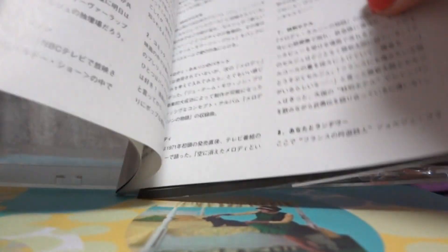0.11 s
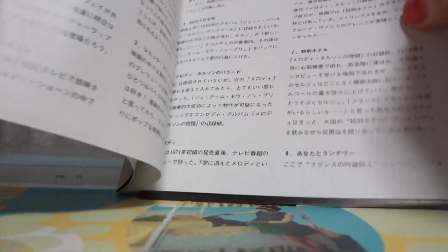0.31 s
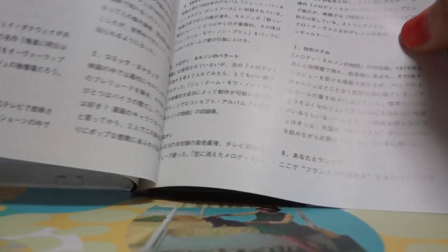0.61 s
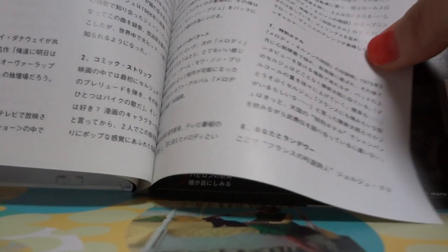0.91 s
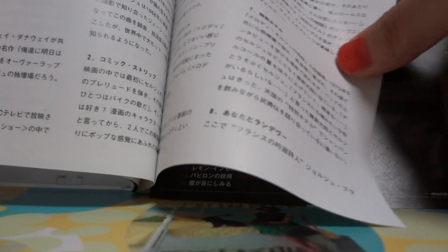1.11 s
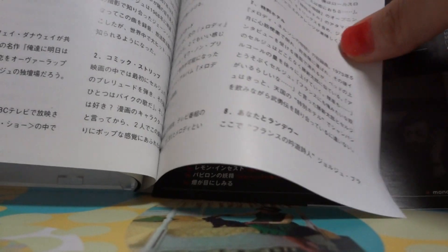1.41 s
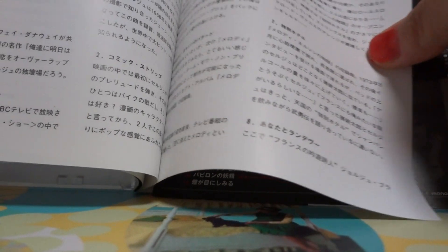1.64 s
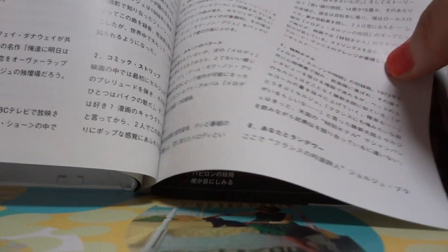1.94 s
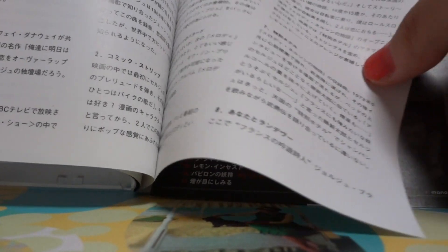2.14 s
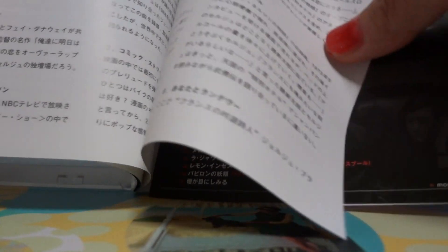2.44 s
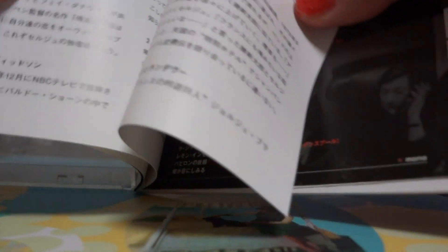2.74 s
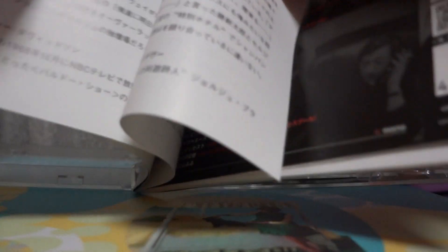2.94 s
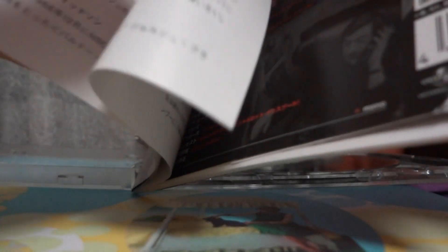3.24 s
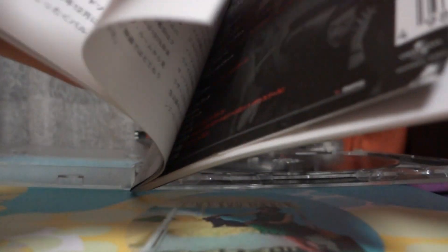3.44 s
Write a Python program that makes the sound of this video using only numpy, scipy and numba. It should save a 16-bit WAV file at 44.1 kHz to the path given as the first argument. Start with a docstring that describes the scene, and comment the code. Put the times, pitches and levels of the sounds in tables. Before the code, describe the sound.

Close up in a quiet room, stiff paper rustles lightly, scrapes in uneven strokes over the sheet below, nearly pauses, then flips with fast airy swishes and tiny snaps, leaving faint room noise.

```python
"""At a table in a quiet room, a thumb drags a thick booklet page across the one below, then lifts and turns it.
The rub is many tiny noise grains: resonances of the air pocket under the arched page colour the drag,
and brighter ones colour the swishes of the free pages. Short noise bursts make the ticks of buckling paper,
soft low swells make the bumps in the table. Short echoes, room noise and one faint steady tone lie around it."""
import sys
import numpy as np
from scipy import signal
from scipy.io import wavfile
from numba import njit

SR = 44100
rng = np.random.default_rng(int(sys.argv[2]) if len(sys.argv) > 2 else 0)


def voltage_ratio(decibels):
    """Convert decibels (scalar or array-like) to amplitude ratios, 20 dB per decade."""
    exponent = np.asarray(decibels, float) / 20
    return 10 ** exponent


def to_wav(sig):
    """Store sig (one row per channel, or 1-D mono) as 16-bit WAV at the path in sys.argv[1].

    Samples outside -1..1 are clipped; the rate is SR.
    """
    pcm = np.clip(np.atleast_2d(sig), -1, 1) * 32767
    pcm = np.round(pcm).astype(np.int16)
    wavfile.write(sys.argv[1], SR, pcm.T)  # frames by channels


N = 158760   # length in samples, 3.6 s

# The rub itself: uneven grains mixed with smooth noise (share of power), its level juddering
GRAINS_PER_S, GRAIN_SPREAD_DB, SMOOTH_SHARE = 9000, 3, 0.45
JUDDER_DB, JUDDER_HZ = 0.88, 56.7
COLOUR_DRIFT_DB, COLOUR_DRIFT_HZ = 2.2, 9   # each resonance swells and fades

# The page edge drags: time_s, treble_level_db, pocket_against_treble_db
DRAG_CURVE = [(.47, -42, -17), (.5, -49.5, -1), (.57, -49, 3), (.583, -44, 7.5), (.595, -62, 26.5),
              (.607, -45, -1), (.617, -45, 13), (.635, -46, 7), (.69, -45.5, 11.5), (.73, -39.5, 7.5),
              (.845, -33, 0), (.86, -41, 6.5), (.96, -34, -0.5), (1.175, -34.5, -5), (1.195, -54, -1),
              (1.22, -41, -1), (1.32, -42.5, 2.5), (1.355, -33.5, -4), (1.39, -45, 1.5),
              (1.445, -31.5, -2.5), (1.5, -36.5, 1), (1.6, -33, -4), (1.82, -35, -0.5), (1.89, -49, 8.5),
              (1.98, -42.5, -2), (2.13, -45.5, 4), (2.165, -38.5, -0.5), (2.22, -46.5, 6.5), (2.27, -39, 0),
              (2.32, -49.5, 7), (2.365, -34.5, -1.5), (2.46, -38.5, 0), (2.49, -51, 7), (2.533, -56, 7),
              (2.545, -48, 3.5), (2.59, -42.5, 0.5), (2.605, -54.5, 1), (2.7, -55, -9), (2.74, -50, -7)]
# Low resonances of the air pocket: start_pitch_hz, width_hz, level_db
POCKET_LOW = [(1130, 2300, -13.5), (1990, 470, -0.5)]
# Another low pocket resonance, growing as the arch rises: pitch_hz, width_hz, level_db
POCKET_DEEP = [(1391, 332, 0)]
# Second pocket resonance: pitch_hz, width_hz, level_db
POCKET_SECOND = [(2706, 1040, 0)]
# Upper pocket resonances: pitch_hz, width_hz, level_db
POCKET_HIGH = [(5430, 1630, -1), (7084, 1080, -2), (8340, 1940, -6.5), (10110, 2300, -8),
               (13000, 4000, -19.5)]
# A pocket resonance that wanders as the arch bends: time_s, pitch_hz
ARCH_PITCH = [(.75, 3880), (.93, 3760), (1.15, 4000), (1.3, 4400), (1.43, 3700), (1.62, 4060), (2.0, 3700),
              (2.45, 4260), (2.7, 5070)]
ARCH_WIDTH_HZ, ARCH_DB = 850, 2
LOW_DB, POCKET_SAG_PER_S = -4.5, 0.035       # sag: how fast the POCKET_LOW pitches sink, as a share
DEEP_START_DB, DEEPENS_DB_PER_S = -3, 1.5
SECOND_DB, SECOND_FOLLOWS = -5.5, 0.9        # against the treble; share of the low resonances' swing

# Free pages brush each other:
# start_s, length_s, level_db, swell_start_to_end_db, flapping_sheet_against_it_db
SWISHES = [(0, 0.04, -61, -27, -14), (0.082, 0.048, -43.5, -4, -22), (0.15, 0.026, -46.5, -5, -33),
           (0.2, 0.047, -41, -6, -22.5), (0.288, 0.09, -39, -12, -18), (0.361, 0.08, -39.5, -2, -18.5),
           (0.428, 0.046, -39, 6, -14), (2.738, 0.11, -41, -18, -8), (2.798, 0.057, -31.5, 12.5, -11.5),
           (2.846, 0.055, -38, -9, -10.5), (2.9, 0.061, -36, 3, -10), (2.948, 0.064, -38, 8, -7),
           (3.004, 0.026, -35, 2, -7.5), (3.02, 0.077, -32.5, -5, -11), (3.072, 0.019, -28, 19, -5.5),
           (3.1, 0.053, -51, 29, -2), (3.145, 0.044, -40.5, 5, -6), (3.178, 0.15, -56.5, -19, -3),
           (3.282, 0.06, -42.5, -10, -6), (3.315, 0.11, -63, -12, 3.5), (3.384, 0.23, -53, 5, -8)]
SWISH_EDGE_S, SWISH_ROUND = 0.0092, 0.47     # quick start and stop; power of the bulge
# Fixed colours of the brushing: pitch_hz, width_hz, level_db
BRUSH = [(7050, 2940, -1.5), (9070, 2050, 2), (10650, 6300, -7.5), (14200, 2700, -26)]
# Main brushing band, following the curl of the free page: time_s, pitch_hz
CURL_PITCH = [(.45, 4880), (2.75, 5950), (3.05, 6020), (3.15, 5050)]
CURL_WIDTH_HZ, CURL_DB = 1300, 4.5
UNDER_SHARE, UNDER_WIDTH_HZ, UNDER_DB = 0.748, 1000, 0   # a lower band at this share of the curl pitch
# The flapping sheet: pitch_hz, width_hz, level_db
SHEET = [(720, 1000, -26.5), (1510, 350, 2.5), (1694, 590, -3), (2444, 1750, -7)]

# The paper buckles: start_s, band_peak_db, centre_hz, ring_t60_s (time to fall by 60 dB)
TICKS = [(.444, -23, 1470, 0.0094), (.447, -27.5, 890, 0.024), (0.462, -35.5, 890, 0.023),
         (0.474, -29, 1160, 0.019), (0.556, -31, 634, 0.013), (0.827, -29, 910, 0.028),
         (0.8283, -17.5, 1950, 0.02), (2.816, -22.5, 1320, 0.0055), (3.0859, -17.5, 2710, 0.0077),
         (3.092, -27, 1110, 0.0037), (3.167, -28, 3030, 0.012), (3.218, -41, 3600, 0.026),
         (3.303, -32.5, 1820, 0.061)]
TICK_CYCLES, TICK_CRACK_DB = 15.3, -16   # fewer ringing cycles than this widen the band; bright crack
TICK_RISE = 0.1                          # share of the ring time

# Bumps through the table: start_s, peak_db, pitch_hz
BUMPS = [(.15, -53, 122), (0.176, -44, 72.6), (0.231, -45, 161), (0.422, -48, 118), (0.452, -38.5, 174),
         (.47, -44, 134), (1.29, -57, 92), (1.497, -44, 110), (2.805, -53, 121), (2.854, -45.5, 110)]
BUMP_S = 0.042                           # a bump swells for a quarter of this

# Placing: left against right in dB
DRAG_PAN_DB, SWISH_PAN_DB, LOW_PAN_DB = 0.27, 1.5, -1.5
LOW_LAG_S, EDGE_SCATTER_DB = 0.00003, -33    # low pocket sound is late on the left; near glint

WALL_S, WALL_DB, WALL_CUT_HZ = 0.013, -14, 4000   # echo fading time, level, treble cut

# Colour of the room noise: pitch_hz, density_db (per Hz, relative)
ROOM_COLOUR = [(25, -12.5), (85, 0), (200, -6.5), (400, -0.5), (900, 4), (1600, -1), (3000, -7),
               (5500, 0.5), (10000, -9), (15500, -25)]
# How alike left and right are in the room noise: pitch_hz, likeness (0 unrelated, 1 the same)
ROOM_LIKENESS = [(30, 1), (150, 0.23), (500, 0.12), (2000, 0.15), (8000, 0.9)]
ROOM_DB = -55
# Faint steady tone: pitch_hz, level_db
HUM_TONES = [(398.4, -77)]


def rms_one(x):
    """Scale a sound so that its average strength (rms) is 1."""
    return x / np.sqrt(np.mean(x ** 2) + 1e-20)


def in_time(rows):
    """Read a curve at every sample; its first column of levels is silent outside the curve."""
    s, db, *others = np.transpose(rows)
    t = np.arange(N) / SR
    level = np.interp(t, s, db, left=-120, right=-120)
    return [level] + [np.interp(t, s, column) for column in others]


def at_hz(points, hz):
    """Read a table at a pitch, with pitch on a log scale."""
    table_hz, value = np.transpose(points)
    return np.interp(np.log(hz), np.log(table_hz), value)


def drift(rate_hz):
    """Slow random wandering with spread 1, made at a fortieth of the sample rate."""
    r = np.exp(-80 * np.pi * rate_hz / SR)
    white = rng.standard_normal(N // 40 + 2002)
    slow = signal.lfilter([1], [1, -2 * r, r * r], white)[2000:]   # drop the filter's start
    return np.interp(np.arange(N) / 40, np.arange(len(slow)), rms_one(slow))


def friction():
    """Fibres catch and slip: dense uneven grains on smooth noise, juddering in level."""
    hit = rng.random(N) < GRAINS_PER_S / SR
    size = voltage_ratio(GRAIN_SPREAD_DB * np.minimum(rng.exponential(1, N), 4.5))
    grains = rms_one(hit * size * rng.choice([-1, 1], N))
    smooth = rng.standard_normal(N)
    rub = np.sqrt(1 - SMOOTH_SHARE) * grains + np.sqrt(SMOOTH_SHARE) * smooth
    return rub * voltage_ratio(JUDDER_DB * drift(JUDDER_HZ))


@njit
def two_pole(x, gain, first, second):
    """Resonator: each sample feeds back the two before it, and the pitch may change every sample."""
    y = np.zeros(len(x))
    for n in range(2, len(x)):
        y[n] = gain * (x[n] - x[n - 2]) + first[n] * y[n - 1] - second * y[n - 2]
    return y


def resonate(x, hz, width_hz):
    """One resonance, fixed or moving, with gain 1 at its top."""
    r = np.exp(-np.pi * width_hz / SR)
    first = 2 * r * np.cos(2 * np.pi * hz / SR) * np.ones(N)
    return two_pole(x, (1 - r * r) / 2, first, r * r)


def body(x, table):
    """Side-by-side resonances, each passed twice, swelling slowly as the page bends."""
    out = np.zeros(N)
    for k, (hz, width_hz, db) in enumerate(table):
        ring = resonate(resonate(x, hz, width_hz), hz, width_hz)
        level = voltage_ratio(db + COLOUR_DRIFT_DB * drift(COLOUR_DRIFT_HZ))
        out += (-1) ** k * level * ring   # neighbours with opposite sign
    return rms_one(out)


def page_drag(rub):
    """The rub rings in the air pocket under the arched page: returns its treble and its low part."""
    t = np.arange(N) / SR
    treble_db, pocket_db = in_time(DRAG_CURVE)
    arch_hz = np.interp(t, *np.transpose(ARCH_PITCH))
    upper = body(rub, [(arch_hz, ARCH_WIDTH_HZ, ARCH_DB)] + POCKET_HIGH)
    second = voltage_ratio(SECOND_DB + SECOND_FOLLOWS * pocket_db) * body(rub, POCKET_SECOND)
    edge = voltage_ratio(treble_db) * (upper - second)
    sag = np.exp(-POCKET_SAG_PER_S * t)
    low = body(rub, [(hz * sag, width_hz, db) for hz, width_hz, db in POCKET_LOW])
    deep = voltage_ratio(DEEP_START_DB + DEEPENS_DB_PER_S * t) * body(rub, POCKET_DEEP)
    return edge, voltage_ratio(treble_db + pocket_db + LOW_DB) * (low + deep)


def strokes():
    """Loudness of the brushing and of the flapping sheet: quick start and stop, bulging middle."""
    t = np.arange(N) / SR
    power = np.zeros((2, N))
    for start_s, length_s, db, swell_db, sheet_db in SWISHES:
        u = np.clip((t - start_s) / length_s, 0, 1)
        edge = np.clip(np.minimum(u, 1 - u) * length_s / SWISH_EDGE_S, 0, 1)
        bulge = np.abs(np.sin(np.pi * u)) ** SWISH_ROUND
        stroke = voltage_ratio(db + swell_db * (u - 0.5)) * edge * bulge
        power += (stroke * voltage_ratio(np.array([[0], [sheet_db]]))) ** 2
    return np.sqrt(power)


def page_swishes(rub):
    """Free pages brush brightly in bands that follow their curl, while the sheet flaps lower down."""
    bright, flap = strokes()
    curl_hz = np.interp(np.arange(N) / SR, *np.transpose(CURL_PITCH))
    under_band = (UNDER_SHARE * curl_hz, UNDER_WIDTH_HZ, UNDER_DB)
    curl_band = (curl_hz, CURL_WIDTH_HZ, CURL_DB)
    return bright * body(rub, [under_band, curl_band] + BRUSH) + flap * body(rub, SHEET)


def ticks():
    """Each buckle is a dying noise burst in a broad band of the sheet, with a faint bright crack."""
    out, t = np.zeros(N + SR), np.arange(SR // 10) / SR
    for start_s, db, hz, t60 in TICKS:
        fade = voltage_ratio(-60 * t / t60) * (1 - np.exp(-t / (TICK_RISE * t60)))
        burst = rng.standard_normal(len(t)) * fade
        spread = np.clip(1 + TICK_CYCLES / (hz * t60), 1, 2.2)
        sos = signal.butter(2, [hz / spread, hz * spread], "band", fs=SR, output="sos")
        band = signal.sosfilt(sos, burst)
        crack = voltage_ratio(TICK_CRACK_DB) * burst / np.abs(burst).max()
        start = int(start_s * SR)
        out[start:start + len(t)] += voltage_ratio(db) * (band / np.abs(band).max() + crack)
    return out[:N]


def bumps():
    """The table takes soft swells of low noise, partly different on each side."""
    out, t = np.zeros((2, N + SR)), np.arange(SR // 4) / SR
    for start_s, db, hz in BUMPS:
        left, right, shared = rng.standard_normal((3, SR // 2))
        noise = 1.18 * np.array([left, right]) + shared
        sos = signal.butter(2, [0.52 * hz, 1.6 * hz], "band", fs=SR, output="sos")
        low = signal.sosfilt(sos, noise)[:, SR // 4:]   # skip the filter's start
        swell = low * t * np.exp(-4 * t / BUMP_S)
        start = int(start_s * SR)
        out[:, start:start + len(t)] += voltage_ratio(db) * swell / np.abs(swell).max()
    return out[:, :N]


def echoes(x):
    """A dozen dull, dying reflections on each side, at different delays."""
    dull = signal.sosfilt(signal.butter(1, WALL_CUT_HZ, fs=SR, output="sos"), x)
    out = np.zeros((2, N))
    for k, u in enumerate(rng.uniform(0.05, 3, 24)):
        lag = int(u * WALL_S * SR)
        out[k % 2, lag:] += (-1) ** (k // 2) * np.exp(-u) * dull[:N - lag]
    return voltage_ratio(WALL_DB) * out


def room_tone():
    """Quiet room noise in half-octave bands, each with its own level and stereo likeness."""
    out = np.zeros((2, N))
    edges = 22 * 2 ** np.arange(0, 9.6, 0.5)
    white = rng.standard_normal((2, 2, N))   # neighbouring bands use different noise
    for k, (low, high) in enumerate(zip(edges, edges[1:])):
        sos = signal.butter(2, [low, high], "band", fs=SR, output="sos")
        mid, side = signal.sosfilt(sos, white[k % 2])
        centre_hz = np.sqrt(low * high)
        alike = np.clip(at_hz(ROOM_LIKENESS, centre_hz), 0, 1)
        band = np.sqrt(1 + alike) * mid + np.sqrt(1 - alike) * side * [[1], [-1]]
        out += voltage_ratio(at_hz(ROOM_COLOUR, centre_hz)) * band
    return voltage_ratio(ROOM_DB) * rms_one(out)


def hum():
    """A steady faint sine tone."""
    t = np.arange(N) / SR
    return sum(voltage_ratio(db) * np.sqrt(2) * np.sin(2 * np.pi * hz * t) for hz, db in HUM_TONES)


def scene():
    """Swishes a little left, low pocket sound a little right, room around."""
    rub = friction()
    edge, low = page_drag(rub)
    swish, snaps = page_swishes(rub), ticks()
    sides = np.array([[0.5], [-0.5]])   # left, right
    n = np.arange(N)
    late_low = np.interp(n - LOW_LAG_S * SR, n, low)
    pocket = np.array([late_low, low]) * voltage_ratio(LOW_PAN_DB * sides)
    # a near glint off the table, 2 ms later, with opposite sign on each side
    scatter = voltage_ratio(EDGE_SCATTER_DB) * np.roll(edge + swish, int(0.002 * SR)) * 2 * sides
    paper = edge * voltage_ratio(DRAG_PAN_DB * sides) + swish * voltage_ratio(SWISH_PAN_DB * sides)
    paper = paper + snaps + pocket + scatter
    return paper + echoes(edge + swish + low + snaps) + bumps() + room_tone() + hum()


def top_cut(x):
    """Nothing passes above the cut-off."""
    return signal.sosfilt(signal.butter(12, 15760, fs=SR, output="sos"), x)


def record(dry):
    """Turn the finished mix into the sound that is written out."""
    return top_cut(dry)


dry = scene()
out = record(dry)
to_wav(out)
```